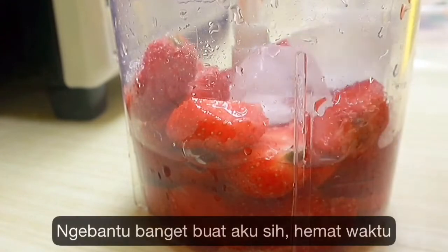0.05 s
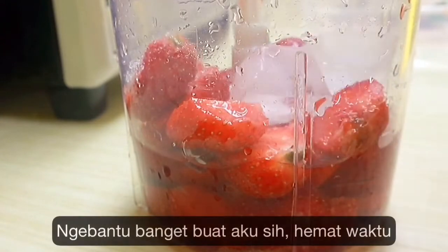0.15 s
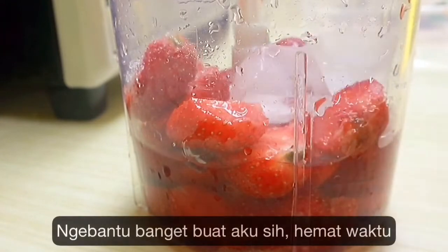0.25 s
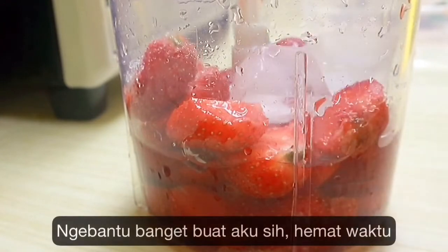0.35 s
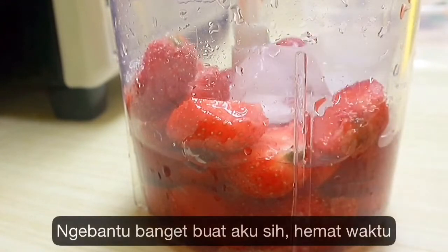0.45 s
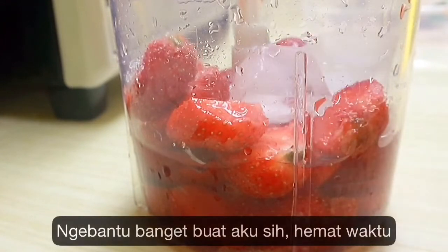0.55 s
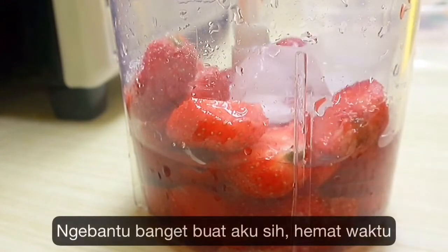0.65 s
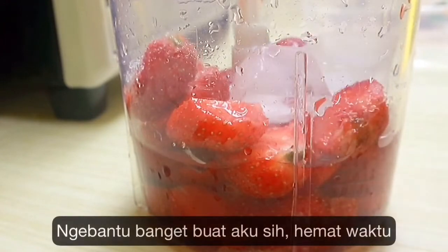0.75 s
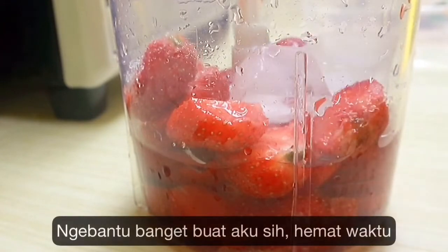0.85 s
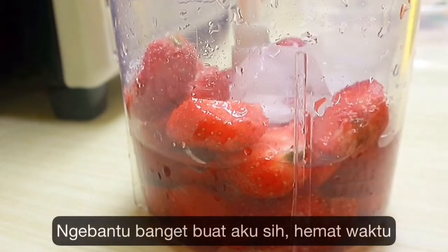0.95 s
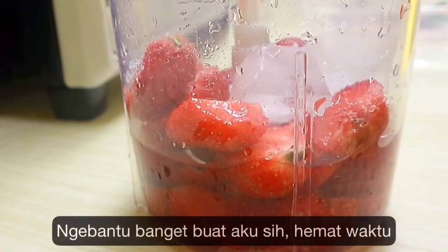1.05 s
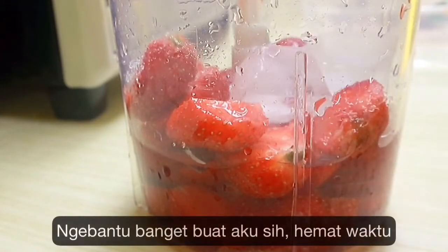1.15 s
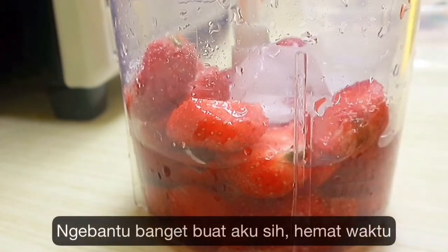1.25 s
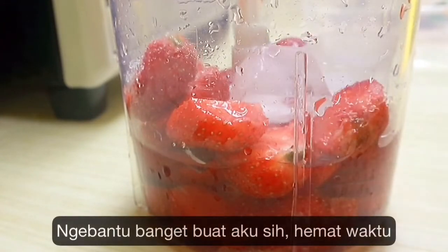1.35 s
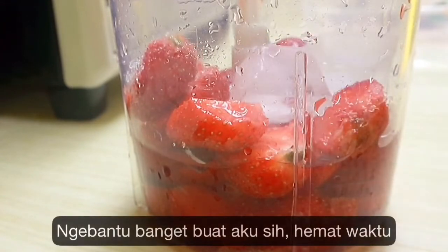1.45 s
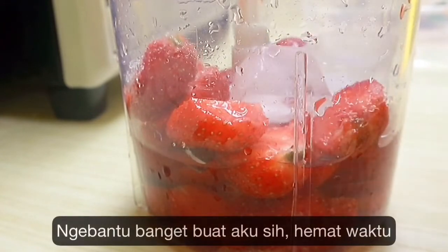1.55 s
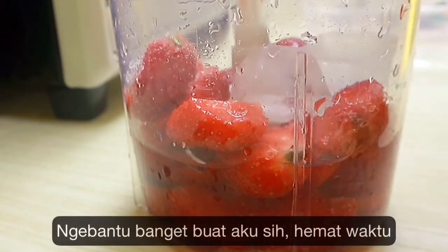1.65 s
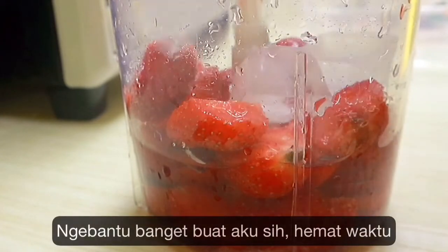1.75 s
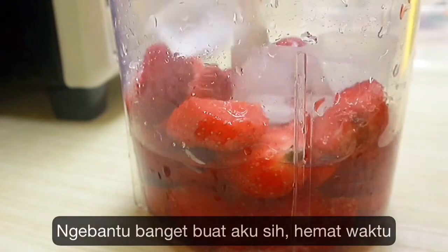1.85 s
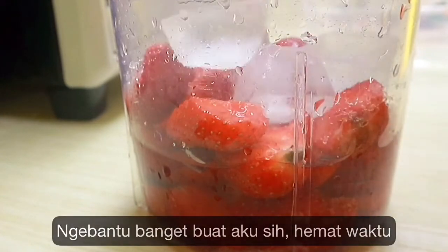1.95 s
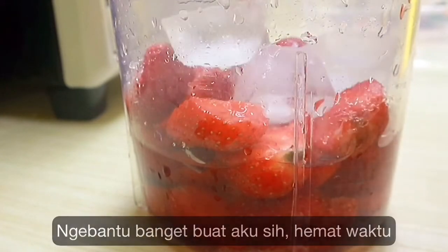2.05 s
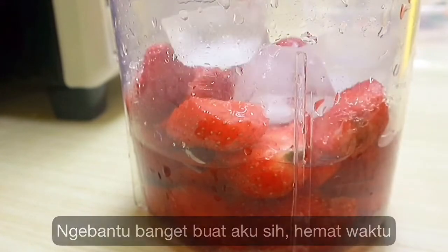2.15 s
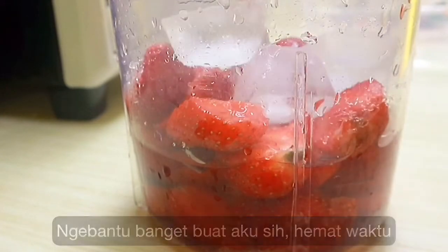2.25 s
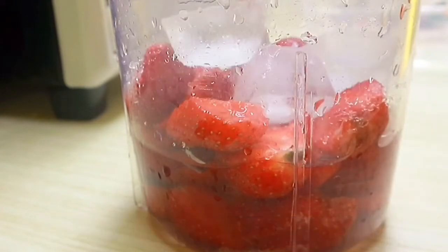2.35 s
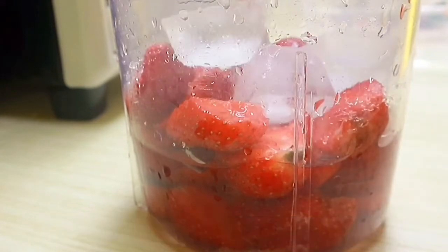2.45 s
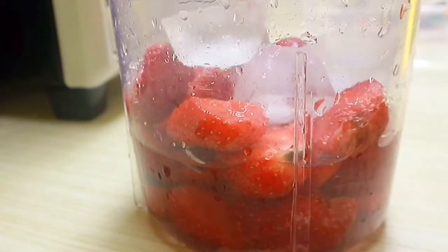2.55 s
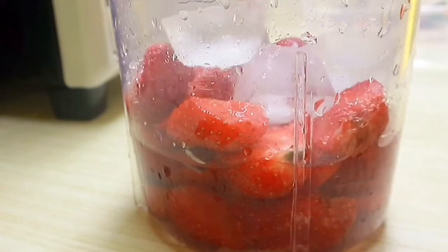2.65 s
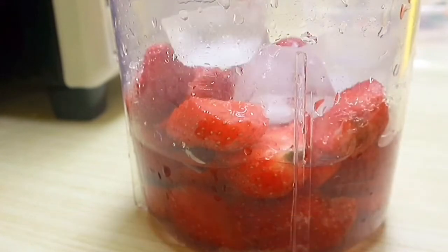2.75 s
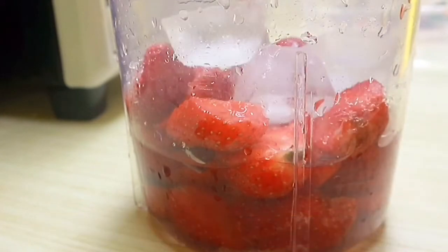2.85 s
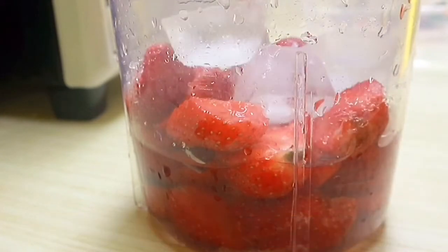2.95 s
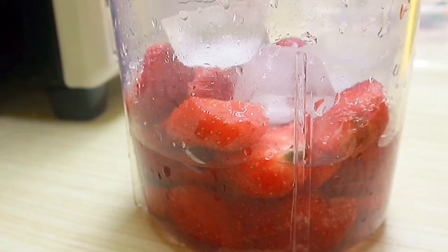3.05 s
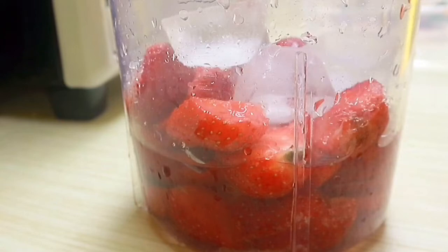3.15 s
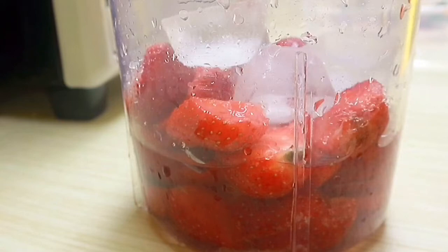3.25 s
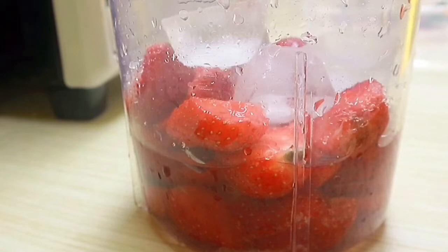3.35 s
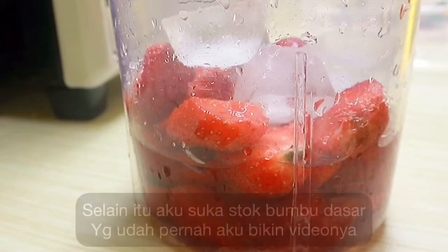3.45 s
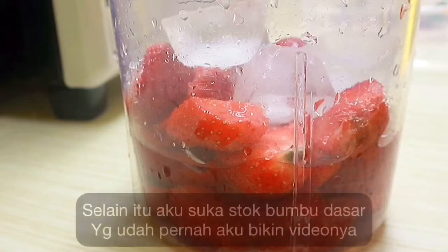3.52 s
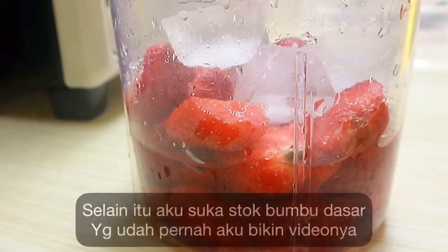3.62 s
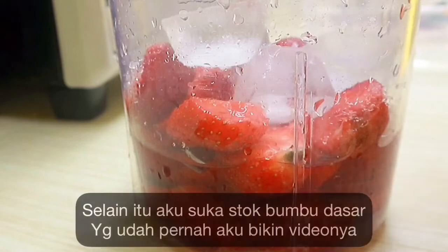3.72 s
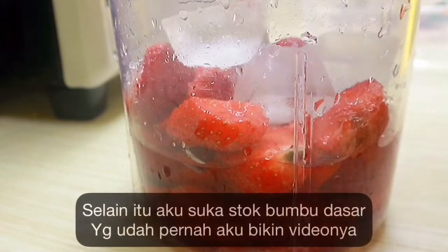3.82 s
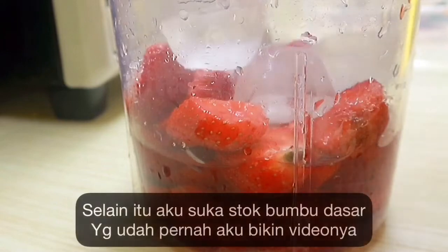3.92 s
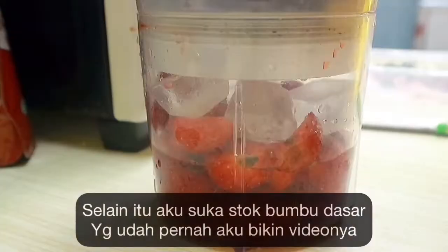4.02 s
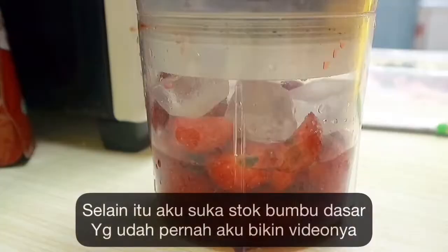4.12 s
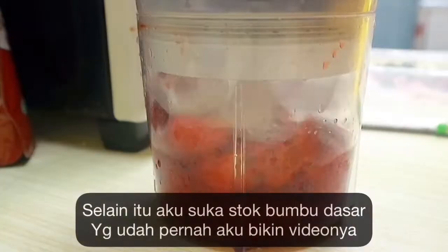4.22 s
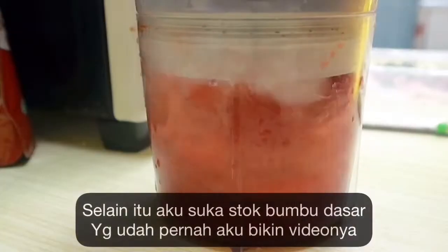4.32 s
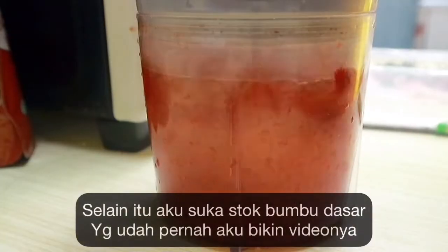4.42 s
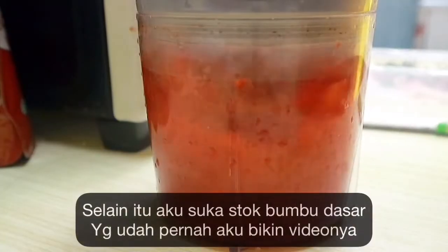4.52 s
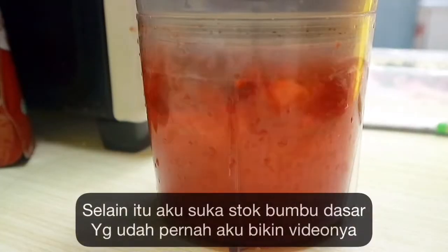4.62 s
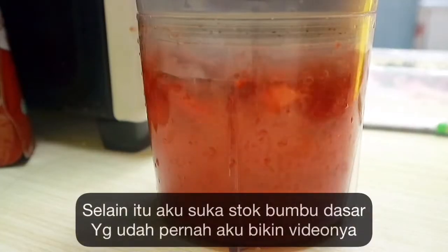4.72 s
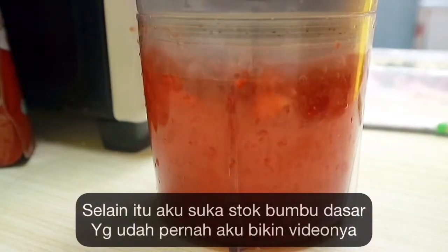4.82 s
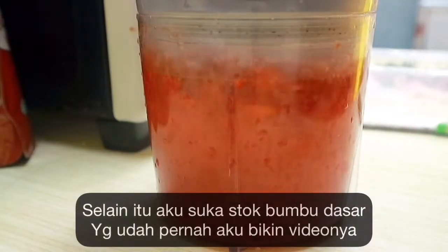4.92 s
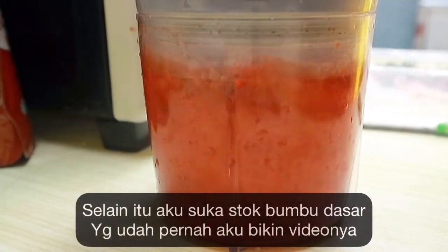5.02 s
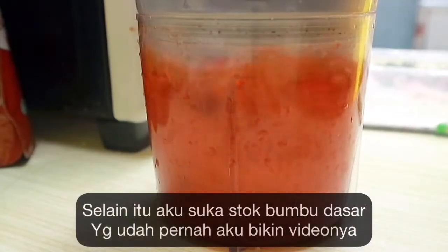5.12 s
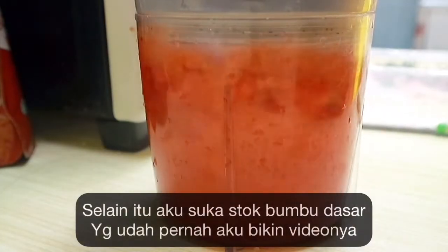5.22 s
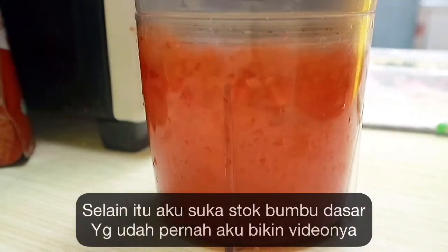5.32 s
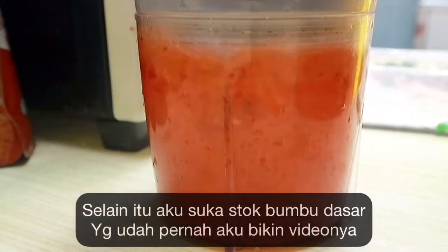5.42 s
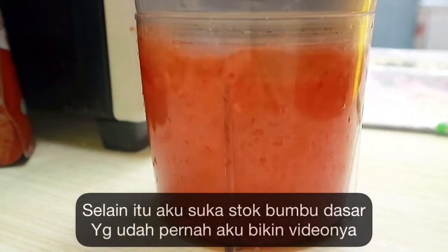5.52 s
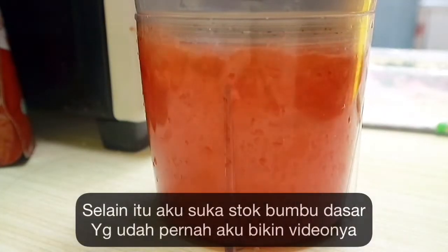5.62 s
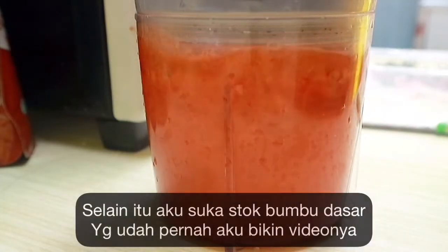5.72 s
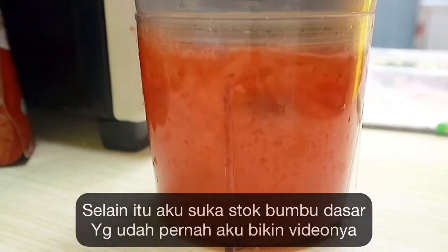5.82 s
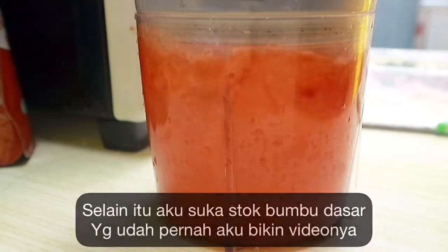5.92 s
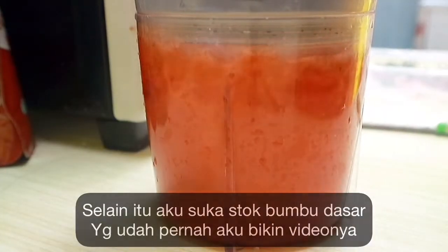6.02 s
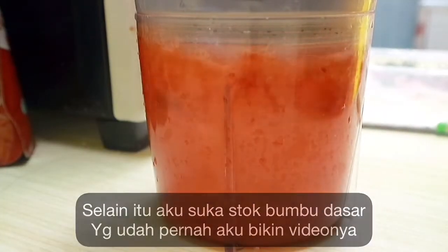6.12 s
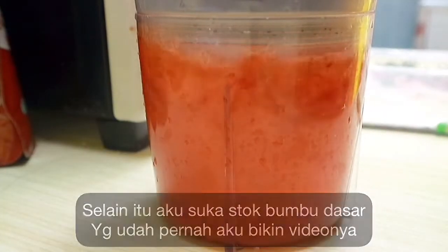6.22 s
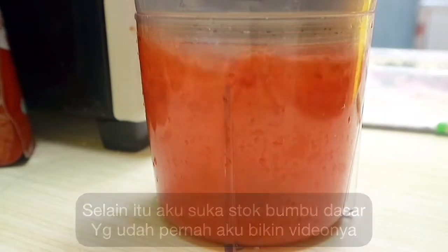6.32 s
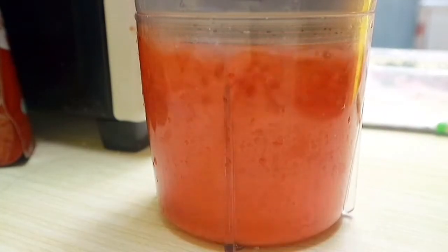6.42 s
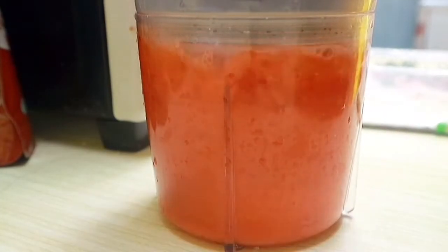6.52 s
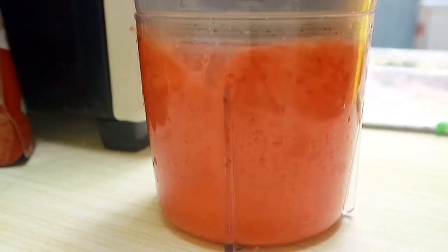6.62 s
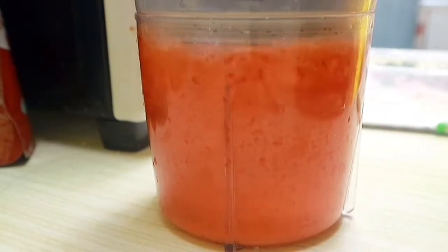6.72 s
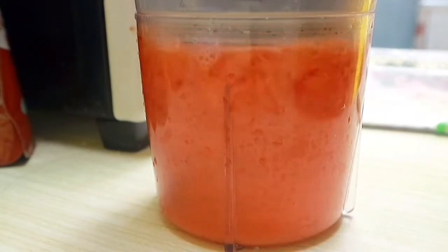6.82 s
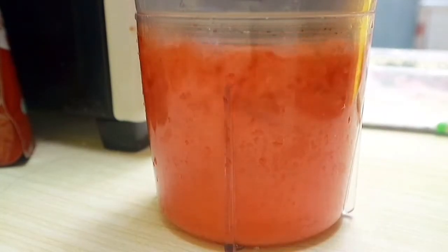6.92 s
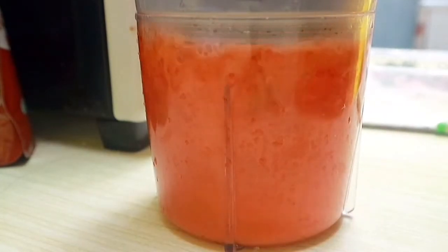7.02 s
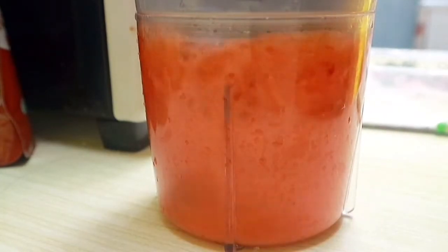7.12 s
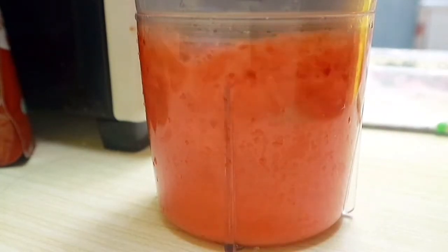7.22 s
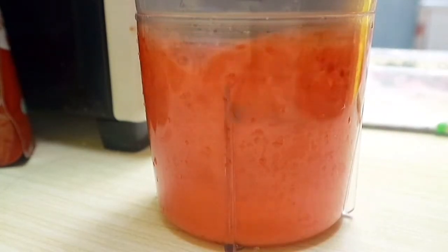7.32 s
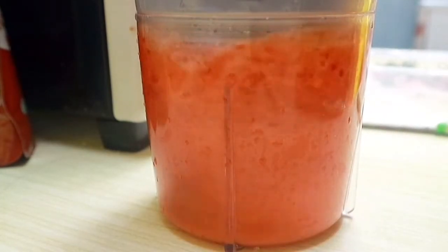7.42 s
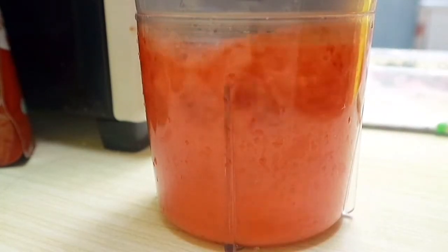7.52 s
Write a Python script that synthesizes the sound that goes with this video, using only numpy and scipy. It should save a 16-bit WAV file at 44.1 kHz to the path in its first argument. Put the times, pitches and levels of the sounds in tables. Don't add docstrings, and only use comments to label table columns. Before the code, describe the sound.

Close stereo microphones in a quiet kitchen. Ice drops hard into a plastic cup of frozen fruit, with hollow knocks and counter thuds, then tiny ticks and wet sliding. Another cube lands near two seconds and settles similarly. After a sharp double knock around four seconds, a blender kicks in abruptly, chopping ice and fruit in a loud, lumpy, low-mid roar that continues to the end.

```python
import sys
import numpy as np
from scipy import signal
from scipy.fft import rfft, irfft, next_fast_len
from scipy.io import wavfile
from scipy.ndimage import map_coordinates

SR = 44100
rng = np.random.default_rng(int(sys.argv[2]) if len(sys.argv) > 2 else 0)


def to_wav(s):
    ch = np.atleast_2d(s).T
    pcm = np.round(np.clip(ch, -1, 1) * 32767)
    wavfile.write(sys.argv[1], SR, pcm.astype(np.int16))


def natural_amplitude(level_db):
    exponent = np.asarray(level_db, float) / 20
    return 10 ** exponent


N = 333837
SCENE_CHANGE_S, HUM_START_S = 4.034, 5.1

# (frequency [Hz], level [dB per Hz])
KITCHEN_COLOUR = [(20, -28), (49, -12.5), (101, -1), (186, -6.5), (340, -8.5), (400, 1.5), (490, -9),
                  (720, -18), (1600, -22.5), (2700, -18.5), (4500, -34.5), (6200, -37.5), (7000, -34.5),
                  (9000, -43.5), (11000, -75.5)]
# (time [s], air level [dB], counter rumble level [dB])
KITCHEN_LEVELS = [(0.0, -36.5, -39), (0.11, -49.5, -42), (0.23, -54, -48), (0.53, -51.5, -65),
                  (0.98, -52, -72), (1.51, -51.5, -64), (1.82, -50.5, -65), (2.0, -48, -46),
                  (2.35, -53, -60), (2.57, -53, -70), (3.51, -50.5, -81), (3.88, -51.5, -67),
                  (4.0, -52.5, -65), (4.17, -50.5, -50), (4.23, -51.5, -39), (4.3, -35, -60)]
# (frequency [Hz], likeness [0-1])
PORT_LIKENESS = [(150, 1), (250, 1), (400, 0.4), (900, 0), (2500, 0.5), (8000, 0.1)]
# (time [s], peak [dB], cup boom [dB], boom pitch [Hz], counter thud [dB], click [dB])
LANDINGS = [(0.01, 0.5, -9, 275.5, -21.5, -18), (0.085, -8, -1.5, 264.7, -17.5, -20.5),
            (0.122, -12.5, -24, 274, -10, -14.5), (0.136, -14, -20, 328, -24, -9.5),
            (0.199, -23, -7, 260.4, -17, -18.5), (1.853, -3.5, -9, 330.6, -12, -10),
            (1.878, -19, 6, 374.3, -2.5, -21), (1.952, -13, -0.5, 269, -19.5, -21.5),
            (1.976, -20, 1, 254.4, -12, -9), (3.968, -3, -6.5, 273, -26, -26.5),
            (4.0, 3.5, -13.5, 361, -26, -24.5), (4.019, -26.5, 3, 245, 1, -22.5)]
# (frequency [Hz], level [dB per Hz])
ICE_COLOUR = [(900, -15), (1600, -8), (2300, -1), (2900, 11), (3250, 1), (3650, 11), (4100, -7.5),
              (4580, 3.5), (5100, -11), (9500, -31.5)]
# (frequency [Hz], level [dB], time to fade by 60 dB [s])
COUNTER_MODES = [(40, -9.5, 0.36), (99, 5, 0.19), (137, 1, 0.1)]
# (frequency [Hz], time to fade by 60 dB [s], level [dB])
ROOM_FADE = [(100, 0.19, -49.5), (345, 0.14, -33), (690, 0.17, -7.5), (1500, 0.35, -10.5),
             (4030, .22, -7.5), (10000, 0.18, -21.5)]
# (time [s], peak [dB], knock [dB], knock pitch [Hz], crackle [dB], length [s])
SHIFTS = [(0.3623, -45.5, 13.5, 880, -28, 0.003), (0.43, -50, 9, 1090, -32, 0.003),
          (0.46, -45, 5, 1300, -45.5, 0.003), (0.554, -42, 6, 902, -11, 0.0027),
          (0.583, -48.5, -15.5, 1390, -13, 0.0035), (0.6673, -27.5, -15.5, 1140, -26, 0.002),
          (0.6797, -29, -37.5, 1140, -25, 0.003), (0.71, -32, 3, 1027, -24, 0.0025),
          (0.7356, -33, 8, 950, -33.5, 0.0028), (0.7944, -37.5, -5, 896, -16, 0.0025),
          (0.8679, -36, -10, 859, -25, 0.0026), (0.9143, -46, -9, 980, -19, 0.0032),
          (0.965, -35.5, 2, 991, -21, 0.0025), (1.0769, -42, 6, 1020, -22, 0.0026),
          (1.0793, -24, -1.5, 1120, -29, 0.0032), (1.1185, -37.5, 11, 945, -19, 0.0035),
          (1.195, -37, 6.5, 950, -7.5, 0.0028), (1.3425, -31.5, 3, 1065, -26, 0.0041),
          (1.362, -39, 14.5, 1160, -20, 0.003), (1.454, -44.5, 15, 1250, -26.5, 0.0039),
          (2.2428, -39.5, 9.5, 940, -14, 0.0035), (2.26, -29, 6.5, 982, -21, 0.0032),
          (2.512, -40.5, 15, 1040, -14, 0.0043), (2.529, -46, -4, 1140, -33.5, 0.003),
          (2.608, -58, -5, 1100, -9, 0.003), (2.6745, -52.5, 19, 920, -28, 0.0025),
          (2.762, -37, -10, 1110, -18, 0.0038), (2.806, -29.5, 3.5, 1350, -24, 0.0027),
          (2.9076, -27.5, -5, 947, -7.5, 0.0027), (2.93, -31.5, -18, 993, -25, 0.003),
          (2.979, -30, 12.5, 1087, -24, 0.0052), (2.992, -29.5, 3, 930, -17.5, 0.0029),
          (3.157, -33, -12, 1027, -13, 0.0028), (3.2775, -29.5, 12.5, 926, -32, 0.003),
          (3.3447, -40.5, 12.5, 852, -26.5, 0.0033), (3.405, -52, 19, 1024, -28.5, 0.003),
          (3.4755, -33.5, 16, 877, -33, 0.003), (3.482, -41.5, 18, 880, -22, 0.0039),
          (3.506, -42, -15, 1230, -33, 0.003), (3.58, -49, 17, 927, -30, 0.0036),
          (4.1834, -56, 17.5, 1173, -29.5, 0.0038)]
# (time [s], fizz level [dB], scrape level [dB])
SLIDES = [
    [(0.6, -70, -61), (0.648, -78, -63), (0.682, -36, -50), (0.702, -65, -58), (0.716, -35, -54),
     (0.772, -49, -52), (0.894, -48, -56), (1.064, -56, -56.5), (1.076, -39, -45), (1.172, -55, -51.5),
     (1.196, -50, -53), (1.27, -62, -65), (1.358, -43, -45), (1.406, -53, -48), (1.62, -65, -60.5)],
    [(2.2, -62, -59), (2.22, -74, -57), (2.26, -46, -57), (2.324, -65.5, -59), (2.49, -72, -56),
     (2.518, -46, -59), (2.57, -69, -61), (2.676, -55, -53), (2.74, -77, -63.5), (2.816, -41, -54),
     (2.826, -52, -53), (3.002, -35, -41.5), (3.014, -48.5, -45.5), (3.168, -52, -52), (3.258, -63, -64),
     (3.278, -52, -52), (3.438, -56, -51), (3.488, -47, -55), (3.65, -82, -63)],
]
# (frequency [Hz], level [dB per Hz])
FIZZ_COLOUR = [(1200, -31), (2200, 3), (2900, 0), (3200, -8), (3650, 3.5), (4300, -14.5), (6000, -14.5),
               (9300, -16.5), (11000, -45.5)]
# (frequency [Hz], level [dB per Hz])
SCRAPE_COLOUR = [(500, -31), (800, -5), (1100, 1.5), (1500, -3.5), (2200, -36.5)]
# (time [s], low level [dB], middle level [dB], high level [dB])
CHURN_LEVELS = [(4.28, -49.5, -40, -71), (4.33, -40.5, -68, -65), (4.44, -20, -36, -33.5),
                (4.47, -26.5, -34.5, -42), (4.71, -27.5, -29.5, -40), (4.89, -23, -30, -36.5),
                (5.02, -24, -23.5, -36), (5.16, -19, -27, -29), (5.43, -26.5, -28, -36),
                (5.75, -21, -25.5, -31.5), (6.12, -19.5, -22.5, -30.5), (6.31, -21, -23.5, -30),
                (6.72, -22, -26, -32.5), (6.9, -21, -21.5, -29), (7.14, -23.5, -26, -34),
                (7.33, -22.5, -25.5, -32.5), (7.49, -20.5, -22, -28.5), (7.57, -18, -16.5, -31)]
# (time [s], peak [dB], boom [dB], brightness [dB])
BLADE_BLOWS = [(4.292, -2, 0.5, -9), (4.35, -7.5, -6.5, -23), (4.385, -12, 8.5, -7.5),
               (4.411, -9, -3.5, -14.5), (4.441, -8, -5.5, -17), (4.487, -16, -6, -10.5),
               (4.708, -30, -6, -26.5), (4.742, -21, -5.5, -32), (4.764, -15, -18.5, -41.5),
               (4.813, -16, -6.5, -23), (4.894, -13, -5, -26.5), (4.953, -18, -10, -32.5),
               (4.974, -16, -10, -19), (5.034, -16, -12, -23), (5.12, -16, -24, -35),
               (5.15, -11, -3.5, -34), (5.195, -9, -5, -11), (5.222, -1, -18, -34),
               (5.333, -15, -6.5, -22.5), (5.389, -13.5, -4.5, -38), (5.444, -15, -6.5, -31.5),
               (5.493, -16, -24.5, -26.5), (5.518, -23, -13.5, -35.5), (5.558, -7.5, -11.5, -28),
               (5.673, -9, -8, -25), (5.774, -16.5, -5, -19.5), (5.818, -8, -23.5, -25),
               (5.893, -12.5, -4, -27.5), (5.938, -7, -19, -33.5), (6.02, -6, -20, -31.5),
               (6.07, -20, 2, -34), (6.099, -8.5, -21, -33), (6.154, -8.5, -9, -22),
               (6.187, -12, -21, -22.5), (6.274, -8, -11.5, -27.5), (6.326, -14, 1, -29),
               (6.379, -7.5, -19, -9), (6.421, -8, -9.5, -27.5), (6.484, -14, -25, -22),
               (6.513, -14.5, -7.5, -21), (6.552, -10, -19, -23), (6.582, -15, -10.5, -18.5),
               (6.669, -16.5, -8.5, -22.5), (6.737, -6, -21.5, -29.5), (6.79, -17, -15.5, -20),
               (6.845, -13, -11, -23.5), (6.888, -23, -13, -21), (6.917, -9.5, -11, -23.5),
               (6.94, -4.5, -19, -23), (6.984, -9.5, 1, -35), (7.037, -12, 1, -20),
               (7.157, -16.5, -26, -33.5), (7.206, -18, -16, -24.5), (7.245, -13.5, -23, -38),
               (7.309, -13.5, -15, -22), (7.346, -15, -20, -21), (7.417, -15.5, -11.5, -24),
               (7.44, -18, 3, -21), (7.476, -11.5, -27, -10.5), (7.515, -10.5, -18, -7)]
# (frequency [Hz], level [dB per Hz])
CUP_COLOUR = [(40, -47), (90, -18), (180, -13), (275, -3), (520, -3), (680, -10), (1010, -12.5),
              (1500, -12), (1620, -18), (3600, -26), (4200, -38.5), (6200, -56.5), (6500, -93.5)]
# (frequency [Hz], width [Hz], height [dB])
CUP_RESONANCES = [(275, 85, 4.5), (349, 10, 6.5), (409.4, 15, 5.5), (512, 88, 5), (572.5, 110, 5.5),
                  (818.5, 64, 4.5), (1206, 88, 5.5), (1447, 30, -2), (3800, 55, 8), (4460, 110, 2.5)]
# (time [s], level [dB], time to fade by 60 dB [s])
BASE_KICKS = [(4.281, -9, 0.14), (4.297, -10, 0.12), (4.35, -12.5, 0.14), (4.384, -25, 0.12)]
# (frequency [Hz], level [dB])
MOTOR_TONES = [(100, -46), (76, -58)]
# (frequency [Hz], lag [radians], left over right [dB])
WIDE_IMAGE = [(100, .05, 0), (170, .25, 1), (280, .8, 6), (430, .9, 4), (700, .9, -3), (1030, 1, -3),
              (1890, 2.6, -1), (2600, 3.1, 0), (4300, 3.7, 0), (9000, 7.7, 0)]
# (frequency [Hz], lag [radians])
NARROW_IMAGE = [(300, 0), (1400, .35), (1850, 2.1), (2600, 2.7), (4300, 3.9), (9000, 7.7)]
# (start [s], end [s])
NARROWING = (4.33, 4.72)


def unit(x):
    return x / np.sqrt(np.mean(x ** 2) + 1e-20)


def along(points, hz, column=1):
    p = np.transpose(points)
    return np.interp(np.log(hz + 1), np.log(p[0] + 1), p[column])


def curves(rows, silent=-120):
    times, *columns = np.transpose(rows)
    lasts = times[-1] > N / SR - .1
    t = np.arange(N) / SR
    return [np.interp(t, times, c, silent, c[-1] if lasts else silent) for c in columns]


def wobble(rate):
    knots = rng.standard_normal(int(N * rate / SR) + 4)
    return map_coordinates(knots, [np.arange(N) * rate / SR])


def filtered(x, response):
    m = next_fast_len(x.shape[-1] + 8192)
    spectrum = rfft(x, m) * response(np.fft.rfftfreq(m, 1 / SR))
    return irfft(spectrum, m)[..., :x.shape[-1]]


def causal(db_of):
    def response(hz):
        c = irfft(np.log(natural_amplitude(db_of(hz)) + 1e-6))
        c[1:len(c) // 2] *= 2
        c[len(c) // 2 + 1:] = 0
        return np.exp(rfft(c))
    return response


def band(lo_hz, hi_hz, order=4):
    def gain(hz):
        below = (lo_hz / (hz + 1)) ** (2 * order)
        above = (hz / hi_hz) ** (2 * order)
        return 1 / np.sqrt((1 + below) * (1 + above))
    return gain


def unit_power(response):
    return response / np.sqrt(np.mean(abs(response) ** 2))


def grains(per_second, spread_db):
    happens = rng.random(N) < per_second / SR
    size, sign = rng.exponential(size=N), rng.standard_normal(N)
    return unit(happens * natural_amplitude(spread_db * np.minimum(size, 3)) * sign)


def ring(t, modes, attack=0.0002):
    total = 0
    for hz, db, t60 in modes:
        strength = natural_amplitude(db + rng.normal(0, 5.5) - 60 * t / t60)
        total = total + strength * np.sin(2 * np.pi * hz * rng.normal(1, .015) * t)
    return total * (1 - np.exp(-t / attack))


def add(track, s, sound):
    start = round(s * SR)
    track[start:][:len(sound)] += sound[:len(track) - start]


def kitchen():
    def shared_and_own(hz):
        turn = np.arccos(np.clip(along(PORT_LIKENESS, hz), -1, 1)) / 2
        return natural_amplitude(along(KITCHEN_COLOUR, hz)) * [np.cos(turn), np.sin(turn)]
    shared, own = filtered(rng.standard_normal((2, N)), shared_and_own)
    air = unit(np.array([shared + own, shared - own]))
    air_db, rumble_db = curves(KITCHEN_LEVELS + [(4.4, -56, -70), (N / SR, -56, -70)])
    rumble = natural_amplitude(rumble_db) * unit(filtered(rng.standard_normal(N), band(28, 62)))
    fridge = natural_amplitude(-60) * unit(filtered(rng.standard_normal(N), band(84, 101)))
    return natural_amplitude(air_db + 4 + wobble(3)) * air + fridge + rumble


def ice(contacts):
    colour = causal(lambda hz: along(ICE_COLOUR, hz))
    return natural_amplitude(6.5) * filtered(contacts, colour)


def drops():
    out, cracks, t = np.zeros(N), np.zeros(N), np.arange(SR // 2) / SR
    wall_modes = [(679, 4.5, 0.013), (921, 1.5, 0.015), (1212, -8.5, 0.017), (1810, -9.5, 0.0083)]
    for s, db, boom_db, boom_hz, thud_db, click_db in LANDINGS:
        wall = 0.77 * ring(t, wall_modes, attack=0.00083)
        boom = natural_amplitude(boom_db) * ring(t, [(boom_hz, 0, .11), (1.36 * boom_hz, -9, .1)], attack=0.0055)
        thud = natural_amplitude(thud_db) * ring(t, COUNTER_MODES, attack=.006)
        fade = natural_amplitude(-60 * t / .012) + natural_amplitude(-20 - 60 * t / .15)
        rattle = rng.standard_normal(len(t)) * fade
        shown = s + t < SCENE_CHANGE_S if s < SCENE_CHANGE_S else 1
        add(out, s, natural_amplitude(db) * (wall + boom + thud) * shown)
        add(cracks, s, natural_amplitude(db + click_db) * rattle * shown)
    return out + ice(cracks)


def counter(x):
    t = np.arange(SR // 40) / SR
    echoes = rng.standard_normal((2, len(t))) * natural_amplitude(-60 * t / 0.025)
    echoes = echoes / np.linalg.norm(echoes[0])
    return filtered(signal.fftconvolve(x[None], echoes, axes=1)[:, :N], band(1500, 12000))


def walls(x):
    hz, t, z = signal.stft(rng.standard_normal((2, SR // 2)), SR, nperseg=256)
    fade = natural_amplitude(-60 * t / along(ROOM_FADE, hz)[:, None])
    tail = signal.istft(z * fade, SR, nperseg=256)[1]
    late = np.pad(x, (130, 0))[None]
    wet = signal.fftconvolve(late, tail / np.linalg.norm(tail[0]), axes=1)[:, :N]
    return filtered(wet, lambda hz: natural_amplitude(along(ROOM_FADE, hz, column=2)))


def ticks():
    knocks, taps, crackle = np.zeros((3, N))
    t = np.arange(SR // 10) / SR
    for s, db, knock_db, knock_hz, crackle_db, length in SHIFTS:
        u = t / np.clip(length, .001, .02)
        rub = rng.standard_normal(len(t)) * u * np.exp(1 - u)
        wall = ring(t, [(knock_hz, 0, .013), (1.3 * knock_hz, -5, .012), (.6 * knock_hz, -8, .015)])
        knock = signal.fftconvolve(rub / np.linalg.norm(rub), wall)[:len(t)]
        add(knocks, s, natural_amplitude(db + knock_db) * knock)
        add(taps, s, natural_amplitude(db - 7) * rub)
        add(crackle, s, natural_amplitude(db + crackle_db) * rub)
    return knocks + ice(taps) + filtered(crackle, band(3900, 9500))


def rustle():
    fizz_contacts = grains(6000, 3.4) * natural_amplitude(2.2 * wobble(22.1))
    fizz = unit(filtered(fizz_contacts, causal(lambda hz: along(FIZZ_COLOUR, hz))))
    scrape_contacts = grains(1600, 2.8) * natural_amplitude(2.4 * wobble(18))
    scrape = unit(filtered(scrape_contacts, causal(lambda hz: along(SCRAPE_COLOUR, hz))))
    out = np.zeros(N)
    for spell in SLIDES:
        fizz_db, scrape_db = curves(spell)
        out += natural_amplitude(fizz_db - 1) * fizz + natural_amplitude(scrape_db) * scrape
    return out


def cup_db(hz):
    peaks = sum(db / (1 + (2 * (hz - c) / w) ** 2) for c, w, db in CUP_RESONANCES)
    return along(CUP_COLOUR, hz) + peaks


def blender():
    registers = [band(20, 700), band(700, 1570, order=10), band(1570, 20000, order=10)]
    swirl = natural_amplitude(.8 * wobble(9) + 1.5 * wobble(42))
    contact = signal.fftconvolve(abs(grains(350, 1.5)), np.hanning(SR // 160), "same")
    t = np.arange(SR // 10) / SR
    blows = np.zeros((3, N))
    for s, db, boom_db, bright_db in BLADE_BLOWS:
        crunch = rng.standard_normal(len(t)) * natural_amplitude(-60 * t / 0.083) * (1 - np.exp(-t / 0.0041))
        for track, more_db in zip(blows, (boom_db, 0, bright_db)):
            add(track, s - .004, natural_amplitude(db + more_db - 3.5) * crunch)
    out = np.zeros(N)
    for gain, level_db, struck, slosh in zip(registers, curves(CHURN_LEVELS), blows, (.9, .6, 1.2)):
        strength = swirl * (unit(contact) + slosh)
        push = unit(strength * rng.standard_normal(N) * natural_amplitude(1.3 * wobble(20)))
        colour = causal(lambda hz: cup_db(hz) + 20 * np.log10(gain(hz) + 1e-9))
        out += filtered(natural_amplitude(level_db) * push + struck, lambda hz: unit_power(colour(hz)))
    splinters = filtered(blows[2], band(6400, 11000))
    return out + natural_amplitude(-29) * splinters


def motor():
    together, opposed = np.zeros((2, N))
    t = np.arange(SR // 4) / SR
    for s, db, t60 in BASE_KICKS:
        low_modes = [(64.6, -11.5, t60), (106.6, -1, t60), (153.4, 2.5, t60), (286, 3, t60)]
        side_modes = [(148.6, -6, t60), (269, 3, t60), (394, 0.5, 1.2 * t60),
                      (630, 1.5, .6 * t60), (940, 4, .5 * t60)]
        add(together, s, natural_amplitude(db) * ring(t, low_modes, attack=0.011))
        add(opposed, s, natural_amplitude(db - 1) * ring(t, side_modes, attack=0.0044))
    t = np.arange(N) / SR
    tones = np.zeros(N)
    for hz, db in MOTOR_TONES:
        tones += natural_amplitude(db + .8 * wobble(5.6)) * np.sqrt(2) * np.sin(2 * np.pi * hz * t)
    fade_in = np.clip((t - HUM_START_S) / .05, 0, 1)
    return tones * fade_in + together + opposed * [[1], [-1]]


def scene():
    filling, blending = drops() + ticks() + rustle(), blender()
    before = np.arange(N) < SCENE_CHANGE_S * SR
    source = filling + blending
    near = source * natural_amplitude([[.3], [-.3]]) + natural_amplitude(-4) * counter(source)
    room = walls(filling) * before + natural_amplitude(-2) * walls(blending)
    return near + room + motor() + kitchen()


def low_pass(x):
    return signal.sosfilt(signal.butter(12, 15600, fs=SR, output="sos"), x)


def record(dry):
    sides = np.array([[-.5], [.5]])

    def wide_ports(hz):
        balance = natural_amplitude(-along(WIDE_IMAGE, hz, column=2) * sides)
        return np.exp(1j * along(WIDE_IMAGE, hz) * sides) * balance
    wide = filtered(dry, wide_ports)
    narrow = filtered(dry, lambda hz: np.exp(1j * along(NARROW_IMAGE, hz) * sides))
    share = np.interp(np.arange(N) / SR, NARROWING, [0, 1])
    ports = filtered(wide + share * (narrow - wide), band(15, 9800, order=6))
    clipped = ports / (1 + abs(ports) ** 8) ** (1 / 8)
    return low_pass(clipped)


dry = scene()
out = record(dry)
to_wav(out)
```